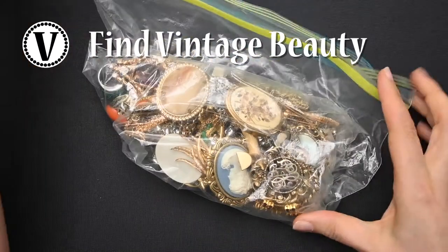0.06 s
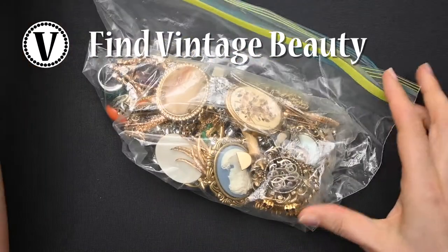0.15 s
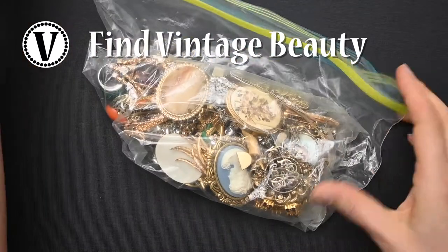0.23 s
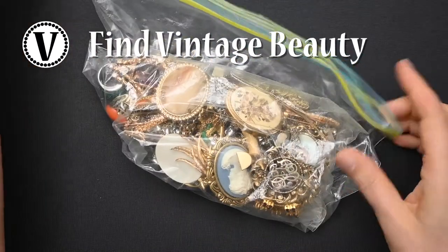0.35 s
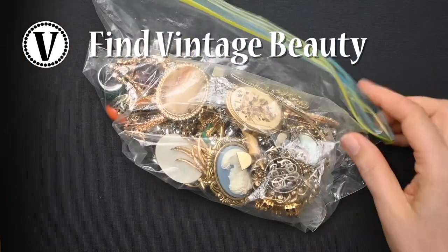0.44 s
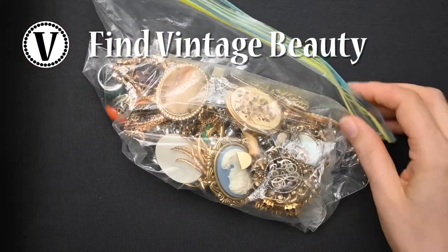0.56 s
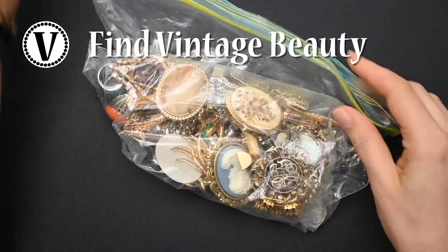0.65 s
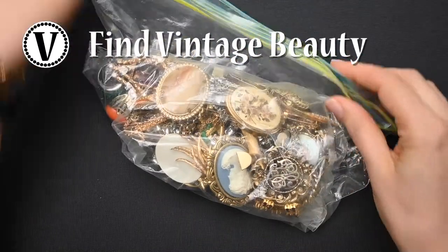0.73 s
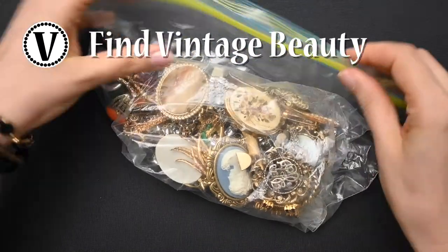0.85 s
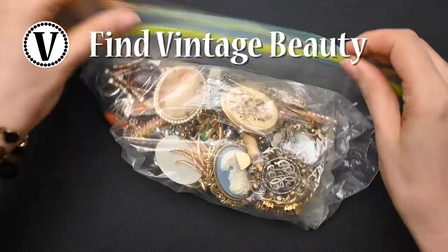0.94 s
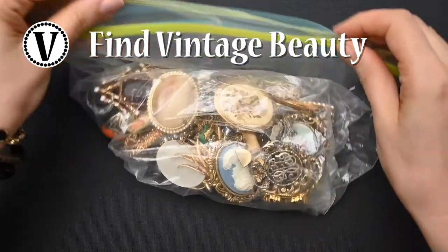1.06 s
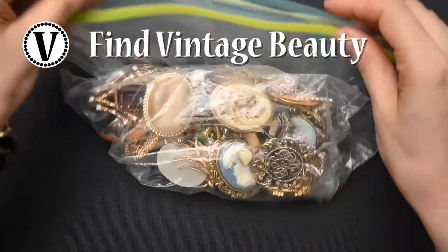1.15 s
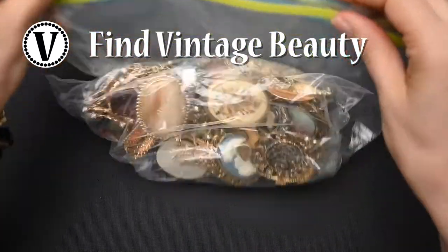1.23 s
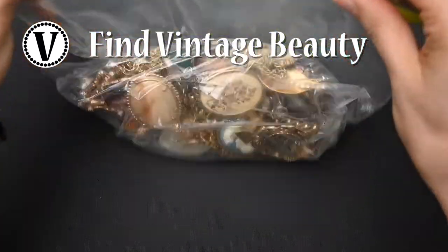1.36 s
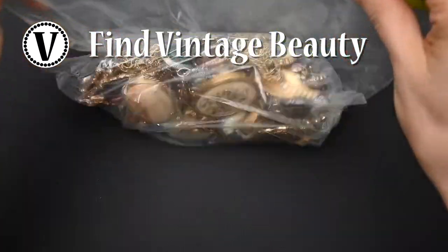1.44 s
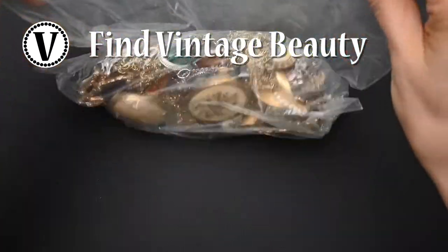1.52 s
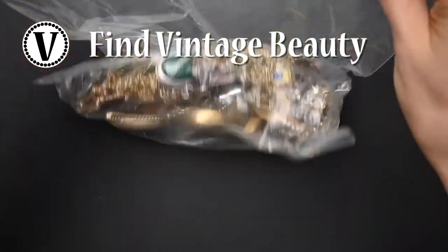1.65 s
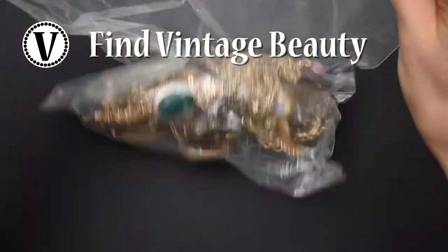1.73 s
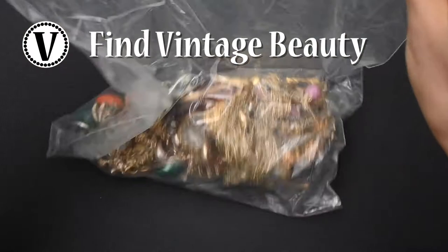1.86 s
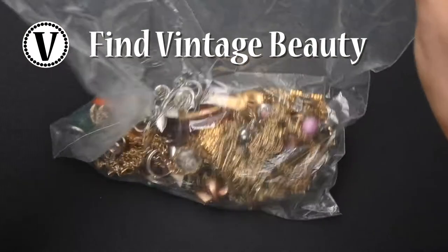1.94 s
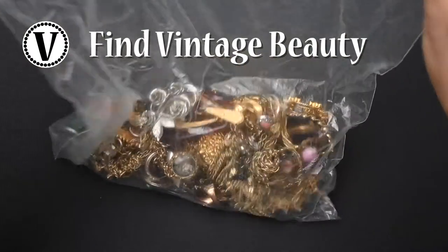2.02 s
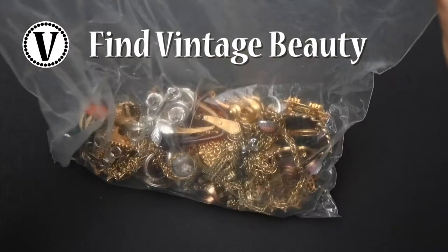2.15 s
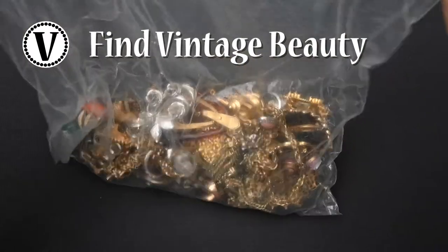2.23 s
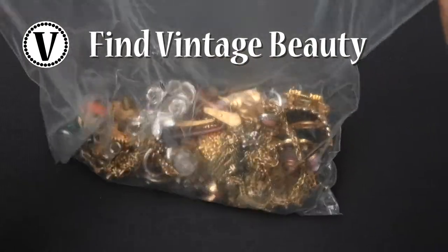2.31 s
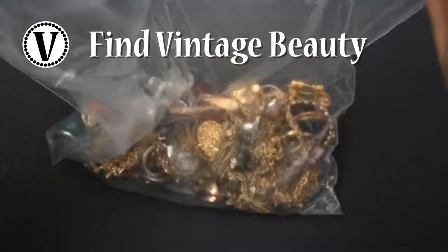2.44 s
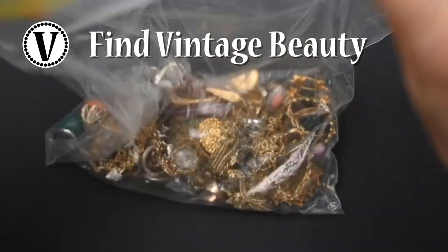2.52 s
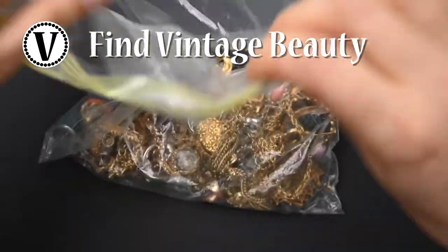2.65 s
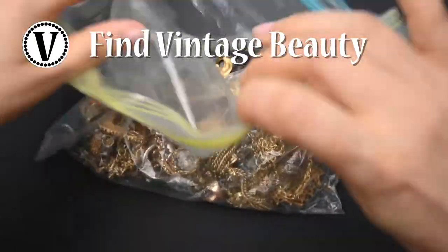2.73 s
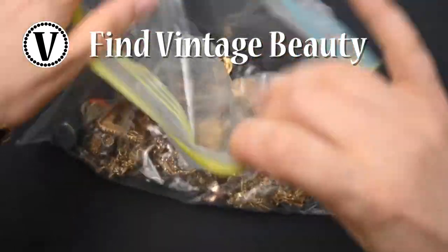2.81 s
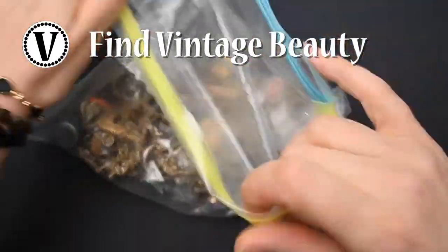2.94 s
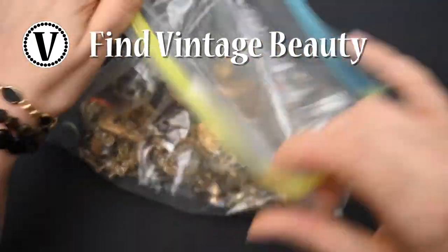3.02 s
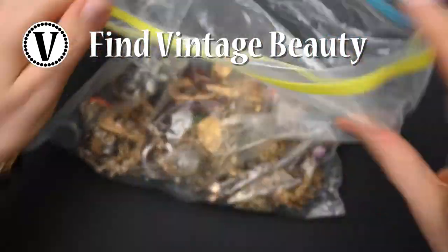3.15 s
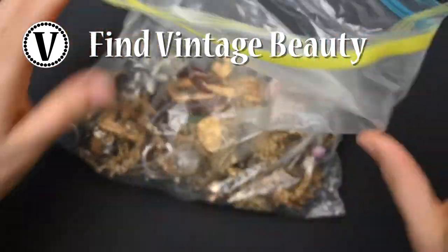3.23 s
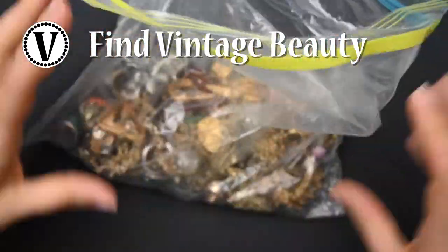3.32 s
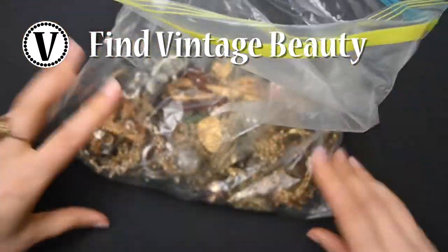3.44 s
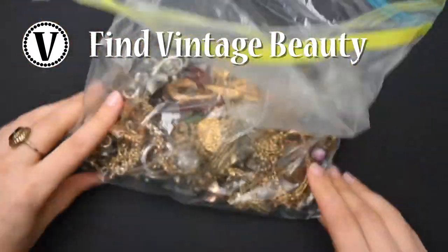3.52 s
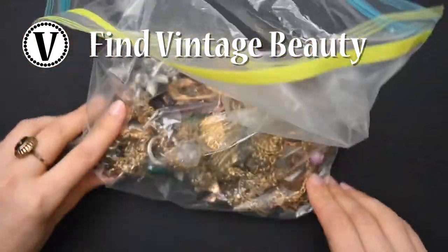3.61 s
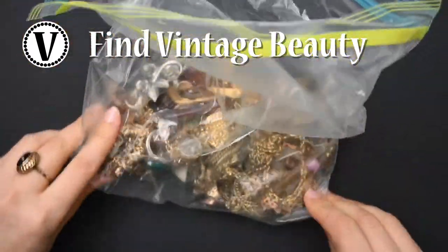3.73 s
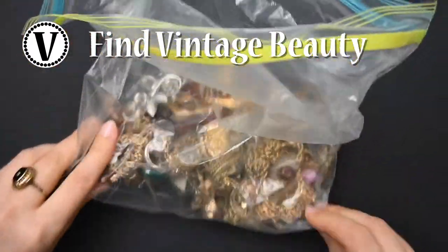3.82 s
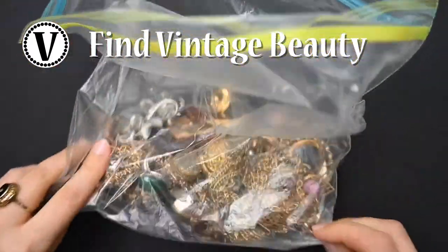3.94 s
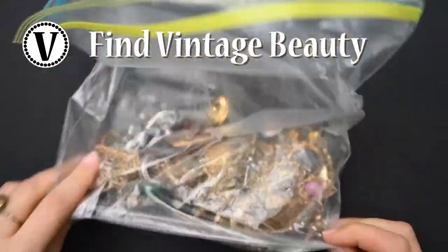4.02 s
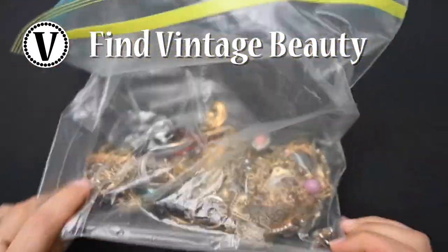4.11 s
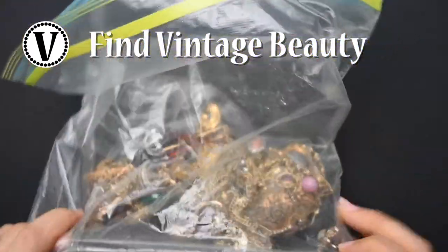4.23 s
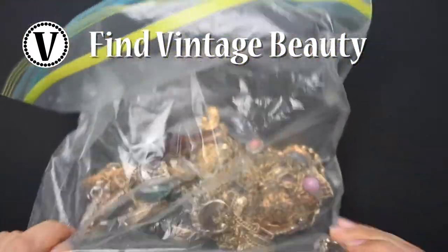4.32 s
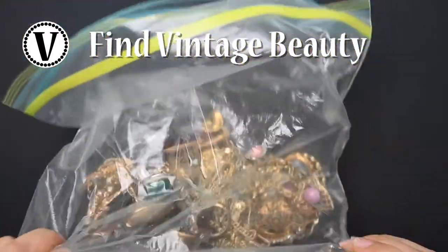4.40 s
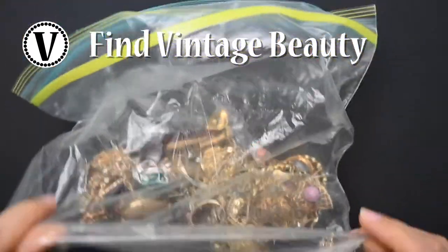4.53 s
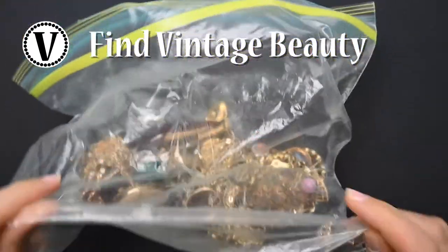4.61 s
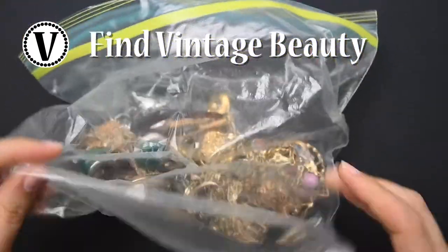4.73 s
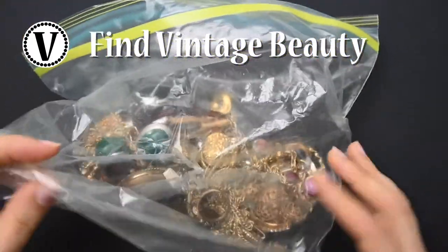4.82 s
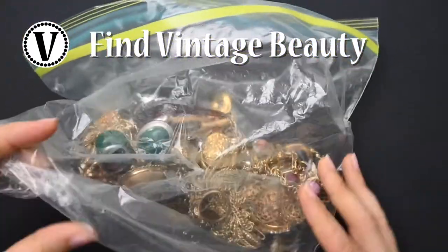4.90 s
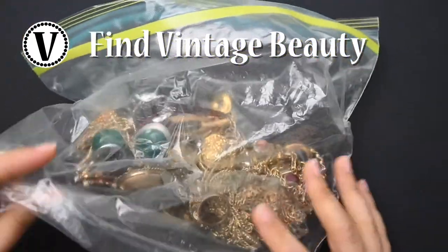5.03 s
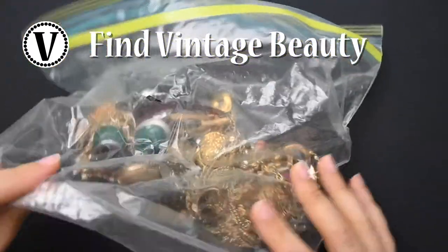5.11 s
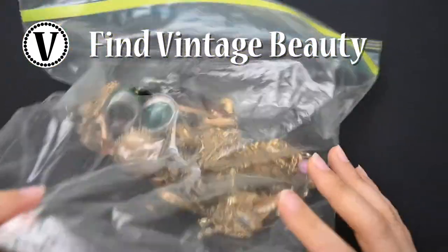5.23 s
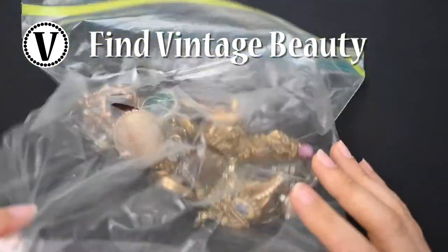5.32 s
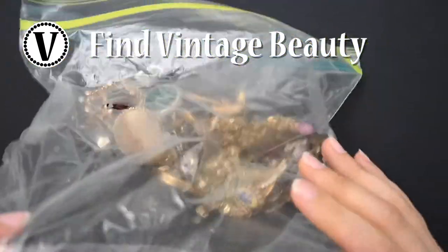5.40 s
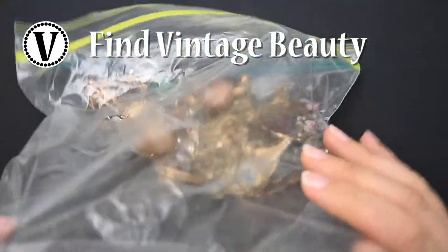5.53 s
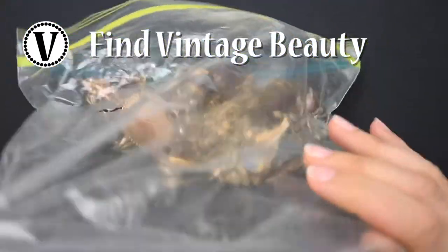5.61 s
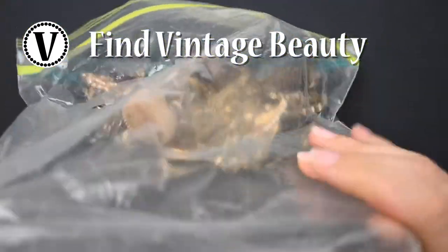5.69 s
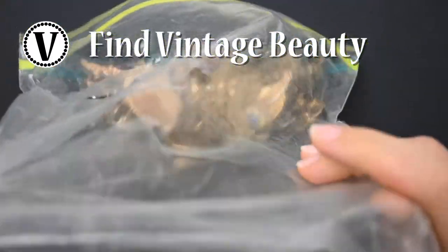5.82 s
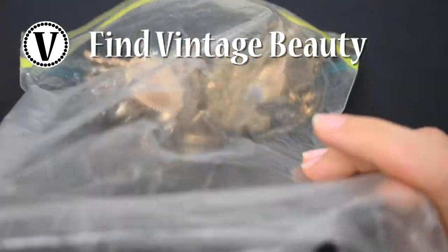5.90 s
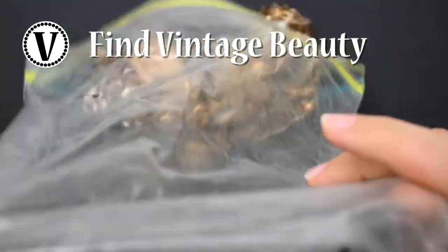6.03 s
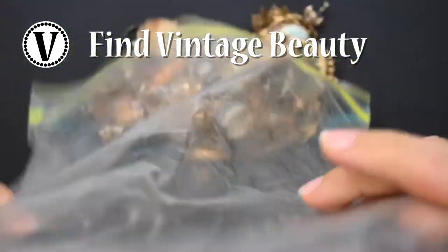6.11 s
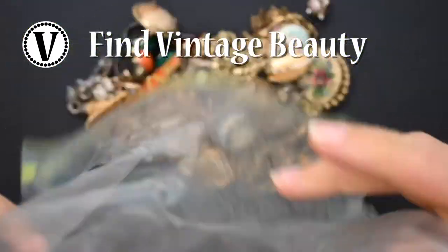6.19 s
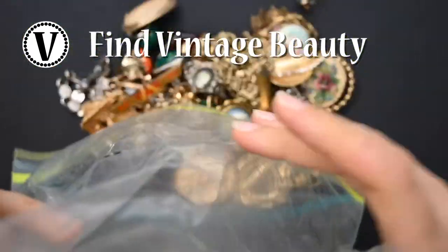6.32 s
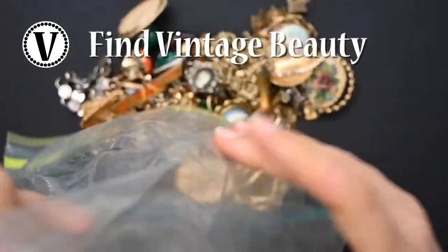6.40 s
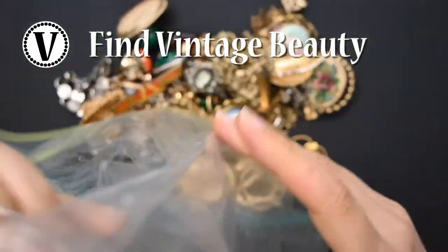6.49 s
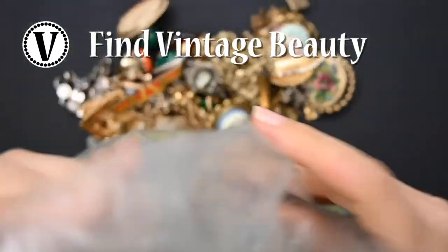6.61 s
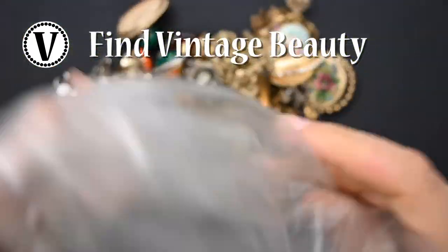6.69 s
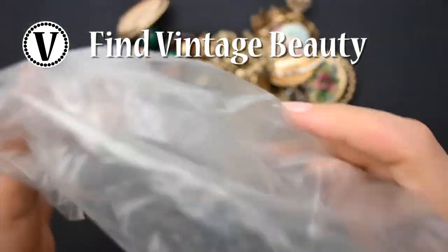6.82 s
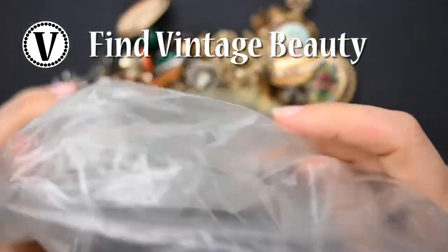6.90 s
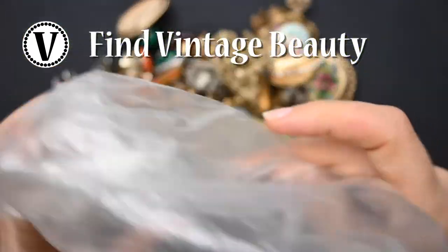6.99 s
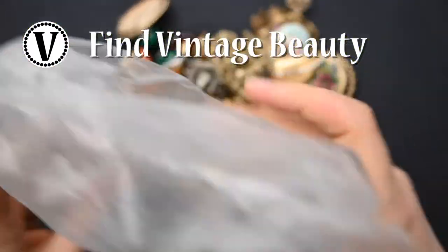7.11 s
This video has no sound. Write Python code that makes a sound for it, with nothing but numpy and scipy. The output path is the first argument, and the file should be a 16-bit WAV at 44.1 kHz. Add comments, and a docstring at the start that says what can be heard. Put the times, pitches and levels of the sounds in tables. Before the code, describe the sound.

Close, crisp plastic film crackling under busy fingers, with a seal pop, bright jewelry clinks, and a low clattering slide onto a table.

```python
"""Plastic film crinkles and snaps along its creases as fingers feel for the seal of a zip bag; the seal pops.
The bag of metal jewelry is pulled open, shaken loose and tipped out on a table in a small room; chains
jingle, the heap slides and tumbles, single pieces clink, and the empty bag is drawn away.
Crinkles and snaps are dying bursts of filtered noise, metal is decaying sines, the slide and thuds are
low noise, and diffuse echoes and a faint room tone surround it all."""
import sys
import numpy as np
from scipy import signal
from scipy.fft import rfft, irfft
from scipy.io import wavfile
from scipy.ndimage import uniform_filter1d

SR = 44100
rng = np.random.default_rng(int(sys.argv[2]) if len(sys.argv) > 2 else 0)


def pcm_store(signal):
    """Save signal as 16-bit PCM."""
    levels = np.round(np.clip(np.atleast_2d(signal), -1, 1) * 32767)
    wavfile.write(sys.argv[1], SR, levels.astype(np.int16).T)


N = 315315
T = np.arange(N) / SR  # s
FIRM_DB = -35.5  # crinkling level that counts as firm handling


def from_db(db):
    """Turn decibels into an amplitude factor."""
    return 10 ** (np.asarray(db) / 20)


def rms_one(x):
    """Scale to an rms of 1."""
    return x / np.sqrt(np.mean(x ** 2) + 1e-20)


def in_time(rows):
    """The columns of a curve, at every sample."""
    s, *columns = np.transpose(rows)
    return [np.interp(T, s, column) for column in columns]


def at_hz(points, hz):
    """Read a spectrum on a log-frequency axis."""
    knots, values = np.transpose(points)
    return np.interp(np.log(hz + 1), np.log(knots), values)


def colour(x, spectrum, low_hz=20, high_hz=18000, size=4096):
    """Causal filter with the given spectrum between two edges; white noise keeps its power."""
    hz = np.arange(size // 2 + 1) * SR / size + 1
    edges = np.sqrt((1 + (low_hz / hz) ** 12) * (1 + (hz / high_hz) ** 16))
    gain = from_db(at_hz(spectrum, hz)) / edges
    # Folding the cepstrum gives minimum phase: the response starts at once.
    cepstrum = irfft(np.log(rms_one(gain) + 1e-4))[:size // 2]
    cepstrum[1:] *= 2
    response = irfft(np.exp(rfft(cepstrum, size)))
    return signal.oaconvolve(x, response)[:N]


def random_clicks(per_s, spread_db, cap):
    """Contacts at random moments, with strengths drawn from a capped exponential in dB."""
    strength_db = spread_db * np.minimum(rng.exponential(1, N), cap)
    return (rng.random(N) < per_s / SR) * from_db(strength_db)


def bursts(clicks, t60):
    """Each click starts a burst of noise that dies by 60 dB in t60 seconds."""
    power_decay = from_db(-120 / (t60 * SR))
    power = signal.lfilter([1], [1, -power_decay], clicks ** 2 + 1e-18)
    return np.sqrt(power) * rng.choice([-1, 1], N)


def ring(clicks, hz, t60):
    """A unit click sets a decaying sine of height 1 ringing."""
    r = from_db(-60 / (t60 * SR))
    w = 2 * np.pi * min(hz, SR / 2 - 1) / SR
    return signal.lfilter([0, np.sin(w)], [1, -2 * r * np.cos(w), r * r], clicks + 1e-18)


def steady(x, size=1500):
    """Even out the slow level to rms 1 and keep the grain."""
    power = uniform_filter1d(uniform_filter1d(x ** 2, size), size)
    return x / np.sqrt(np.maximum(power, 1e-12))


def dealt_rings(knocks, modes, t60):
    """Each contact rings one randomly chosen mode, quickly damped by the heap."""
    signed = knocks * rng.choice([-1, 1], N)
    dealt = rng.integers(0, len(modes), N)
    rings = sum(from_db(db) * ring(signed * (dealt == k), hz, t60) for k, (hz, db) in enumerate(modes))
    return steady(rings)


# moves of the hands: [start t/s, end t/s, crinkling level/dB at start, crinkling level/dB at end,
# sliding level/dB relative to film, fine ticking level/dB relative to film]
MOVES = [(0.0, 0.496, -49, -61.5, -5, -5), (0.55, 0.604, -43, -45.5, -4.5, -5.5),
         (0.725, 0.964, -50, -39.5, -5.5, -7), (1.093, 1.464, -48, -36.5, -8, -4.5),
         (1.537, 1.644, -40, -38.5, -11, -3), (1.682, 1.95, -37, -32.5, -13, 1),
         (2, 2.128, -36, -38.5, -9.5, -2.5), (2.228, 2.313, -37.5, -41.5, -9.5, -8.5),
         (2.37, 2.853, -39, -39, -7.5, -6.5), (2.861, 2.943, -33, -31, -9, -6.5),
         (2.99, 3.115, -44.5, -31.5, -8, -7), (3.484, 3.505, -37.5, -39, -5, -5),
         (3.556, 3.684, -38, -40, -11.5, -1), (3.741, 3.931, -44, -38, -10.5, -3),
         (4.015, 4.12, -38, -34.5, -11, -3), (4.177, 4.208, -39, -35.5, -10, -2.5),
         (4.272, 4.403, -38, -35, -11, -3.5), (4.435, 4.578, -38, -40.5, -10, -3.5),
         (4.628, 4.833, -37.5, -36.5, -11, 0), (4.86, 4.92, -40, -41, -11.5, 0),
         (5.04, 5.527, -36.5, -35.5, -10, -3), (5.57, 5.808, -37, -36, -8, -3.5),
         (5.843, 6.024, -35.5, -36.5, -8.5, 1), (6.093, 6.306, -34.5, -34, -12, 1),
         (6.359, 6.39, -45, -42.5, -8, -10), (6.53, 6.55, -37, -37, -8.5, -7),
         (6.59, 6.726, -35.5, -37, -9, -8.5), (6.75, 6.842, -41, -42, -8.5, -6),
         (6.88, 6.988, -39, -44, -9.5, -8), (7.025, 7.144, -40, -42.5, -5, -9)]
GRIP_DB_PER_S, SETTLE_DB_PER_S = 695, 119  # how fast a move sets in and the film comes to rest
RESTING_DB = -58  # faint creeping of the film between moves


def handling():
    """Each move sets in quickly, swells or eases, and dies away: levels in dB of heap, film, ticking."""
    t = T[::32]
    levels = np.full((3, len(t)), RESTING_DB) + np.array([[-3], [0], [-8]])
    for start, end, start_db, end_db, heap_db, tick_db in MOVES:
        effort = np.interp(t, [start, end], [start_db, end_db])
        effort = effort - GRIP_DB_PER_S * np.maximum(start - t, 0)
        effort = effort - SETTLE_DB_PER_S * np.maximum(t - end, 0)
        levels = np.maximum(levels, effort + np.array([[heap_db], [0], [tick_db]]))
    return [np.interp(T, t, level) for level in levels]


def unevenness(per_s=45, spread_db=1.5):
    """The film catches and lets go under the fingers: a quick wobble of the level in dB."""
    knots = rng.standard_normal(1024)
    return spread_db * np.interp(T * per_s, np.arange(len(knots)), knots)


def avalanches(per_s, clump_db):
    """Folds and links give way in little runs: a rate factor that wanders about 1."""
    knots = rng.standard_normal(4096)
    surge = from_db(clump_db * np.interp(T * per_s, np.arange(len(knots)), knots))
    return surge / surge.mean()


def crinkle(folds, film_db, t60, scatter_db, rub, gentle_db=-46, gentle_rub=1.0):
    """Tiny folds flip, each with its own strength in this register; gentle handling mostly just rubs."""
    rub = rub + gentle_rub * np.clip((gentle_db - film_db) / 4, 0, 1)
    flips = folds * from_db(scatter_db * rng.standard_normal(N))
    grains = steady(bursts(flips, t60), size=2200)
    return steady(grains + rub * rng.standard_normal(N), size=2200)


def beads(per_s, t60, count=26):
    """Beads and brooches jostle, each with a pitch of its own."""
    pitches = np.linspace(1000, 6000, count) + rng.normal(0, 48, count)
    knocks = random_clicks(per_s, spread_db=-1.5, cap=3.3)
    return dealt_rings(knocks, [(hz, 0) for hz in pitches], t60)


# how far the bag lies flat under the hands: [t/s, share 0-1]
LYING_FLAT = [(3.2, 0.12), (3.9, 0.68), (6.2, 0.73), (6.5, 0.1)]
# spectra of the hanging film, the film lying flat, and its treble: [f/Hz, level/dB per Hz]
FILM_HELD = [(900, -4.5), (1300, 2.5), (1800, 0), (2100, -1.5), (2600, 1), (3050, -4), (3700, -5),
             (4800, 1), (5400, -3.5), (6200, -8), (7300, -4), (8700, -14.5)]
FILM_FLAT = [(900, 2.5), (1200, -5), (1800, -2), (2600, -5), (3050, -5.5), (3500, 1), (3850, -1),
             (4400, 4.5), (5200, 2), (6200, -6.5), (7200, -3.5), (8700, -5.5)]
FILM_TREBLE = [(8000, -5.5), (9000, -6.5), (11000, -2.5), (12200, 2), (13200, 4.5), (14200, 1.5),
               (15000, -0.5), (16000, -8)]


def bag(folds, film_db, treble_gain, bead_share):
    """The film's broad resonances shift as the bag is laid flat; while it hangs, the pieces jostle in it."""
    flat = np.clip(in_time(LYING_FLAT)[0], 0, 1)
    share = np.clip(bead_share, 0, 1)
    hanging_film = np.sqrt(1 - share) * crinkle(folds, film_db, t60=0.013, scatter_db=3.0, rub=0.076)
    body = hanging_film + np.sqrt(share) * beads(per_s=420, t60=0.014)
    held = colour(from_db(film_db - 2.0) * np.sqrt(1 - flat) * body, FILM_HELD, low_hz=850, high_hz=8900)
    body = crinkle(folds, film_db, t60=0.0077, scatter_db=1.5, rub=0.78)
    lying = colour(from_db(film_db - 0.15) * np.sqrt(flat) * body, FILM_FLAT, low_hz=644, high_hz=7960)
    ticks = treble_gain * crinkle(folds, film_db, t60=0.0067, scatter_db=2.5, rub=0.69)
    return held + lying + colour(ticks, FILM_TREBLE, low_hz=7600)


# modes of the chain links: [f/Hz, level/dB relative to each other]
LINKS = [(7420, 7), (8470, -2), (10170, -6), (11650, -15), (12290, 10), (12600, 9), (12810, -9),
         (13050, 12), (13230, -34), (13400, 6), (13610, 12), (13950, -7), (14400, -14), (15360, 7)]


def chains(surge, per_s, t60):
    """Small links knock together and shimmer."""
    return dealt_rings(random_clicks(per_s * surge, spread_db=10.0, cap=1.0), LINKS, t60)


# spectrum of the sliding load: [f/Hz, level/dB per Hz]
HEAP = [(25, -26), (60, -20), (100, -16), (170, -8.5), (270, -3), (400, 0.5), (650, 1.5), (900, -2)]


def heap(folds, film_db, slide_db):
    """The load drags over the table top with a low, grainy rub."""
    slide = from_db(slide_db - 0.67) * crinkle(folds, film_db, t60=0.023, scatter_db=1.5, rub=0.5)
    return colour(slide, HEAP, high_hz=1054)


# spectrum of the steady background: [f/Hz, level/dB per Hz]
ROOM_TONE = [(25, -5), (100, 2), (400, 4), (1300, 5), (5000, -13), (9000, -44), (16000, -23)]


def room_tone(level_db=-61.5):
    """A faint, steady, mostly low noise."""
    return from_db(level_db) * colour(rng.standard_normal(N), ROOM_TONE)


def snaps(times, level_db, tone, t60, size=600, window_s=.004):
    """Dying bursts of noise rung through a tone; each has the given rms over the window."""
    raw = rng.standard_normal((len(times), size)) * from_db(-60 * T[:size] / t60)
    out = np.zeros(N + SR)
    for s, db, burst in zip(times, level_db, signal.fftconvolve(raw, tone[None, :size], axes=1)):
        start = round(s * SR)
        scale = np.sqrt(window_s * SR) / np.linalg.norm(burst)
        out[start:start + len(burst)] += from_db(db) * scale * burst
    return out[:N]


SMALL_CREASES_PER_S = 45  # under firm handling
SMALL_CREASE_DB, SMALL_CREASE_SPREAD_DB = -1.5, 4  # level relative to the film, and its scatter
SMALL_CREASE_BODY_DB, SMALL_CREASE_BRIGHT_DB = -7.5, 1  # low and top registers relative to the middle


def small_creases(film_db, brightness_spread_db=3, count=900):
    """Lesser creases give at random, more often and louder up to a firm grip: rows like CREASES."""
    when, chance = rng.random((count, 2)).T
    strength, brightness = np.clip(rng.standard_normal((count, 2)).T, -2, 1)
    s = when * T[-1]
    effort_db = np.minimum(np.interp(s, T, film_db), FIRM_DB)
    level_db = effort_db + SMALL_CREASE_DB + SMALL_CREASE_SPREAD_DB * strength
    body_db = np.full(count, SMALL_CREASE_BODY_DB)
    bright_db = SMALL_CREASE_BRIGHT_DB + brightness_spread_db * brightness
    rows = np.column_stack([s, level_db, body_db, bright_db])
    per_s = SMALL_CREASES_PER_S * from_db(.3 * (effort_db - FIRM_DB))
    return rows[chance < per_s * T[-1] / count]


# large creases snapping through: [t/s, middle register level/dB, low body level/dB relative to middle
# (before a small cut), bright top level/dB relative to middle]
CREASES = [(0.016, -42.5, 1, -14), (0.0961, -49.5, 11, -10), (0.135, -46, -11, -12), (0.181, -48, 7.5, 0.0),
           (0.228, -52, 4, -4.0), (0.279, -48.0, 4.5, 6.5), (0.293, -36.0, -11, -17.5),
           (0.3579, -45, -3, 2.0), (0.3693, -49.0, 0.0, -13.5), (0.4105, -49.5, -2, -4.5),
           (0.627, -47.5, 0.5, -3), (0.705, -38, -5, -2.5), (0.7164, -42.5, -1, 3), (0.7335, -49.5, 3, 9),
           (0.7478, -49.5, -1, 10), (0.835, -40.5, 4.5, -2.5), (0.8419, -29, -2.5, 5),
           (0.8845, -31, -15, -7), (0.9066, -32, 3, 0.5), (0.9589, -32.5, -6, -7), (0.9745, -39, -13, -3.0),
           (0.9847, -49, -1.0, 9.0), (1.0642, -38.5, -4.5, -13), (1.1191, -32, -6.5, -9.5),
           (1.142, -37.5, 3.5, 4.5), (1.1592, -40, -16, 1.5), (1.1698, -39.5, 3, -4.5),
           (1.2271, -36.0, -2, -2), (1.2844, -42, 8, 5.5), (1.331, -37.0, -11.5, -15.5),
           (1.4311, -33.5, -10, -0.5), (1.5256, -34.5, -12.5, 5), (1.557, -28, -4, -3),
           (1.584, -38.5, -12, 7.5), (1.697, -34.5, -15, 0), (1.8173, -29.5, -18, 10.5),
           (2.1933, -33, -5, 6), (2.2085, -37, -2, 2), (2.2169, -34, -0.5, 4), (2.2294, -39.5, 10.5, -4.0),
           (2.242, -35, -3, 5), (2.257, -31, -7, 0), (2.2615, -27.5, -2.5, -1), (2.2683, -33, -7.5, 2),
           (2.2975, -37, -14, 4.0), (2.3638, -34.5, 0.5, 0), (2.4071, -32.0, 0, -13),
           (2.4403, -26.5, -4, -19), (2.4818, -30.5, -1, 1.0), (2.4907, -31.0, 2, 5.5),
           (2.5242, -32, 1, 2.0), (2.5794, -26.5, 2.5, -14.5), (2.5885, -31.5, 3, -7),
           (2.6085, -30, -1, -1), (2.6482, -36, -0.5, -11.0), (2.6602, -32.0, -14, -8.0),
           (2.7156, -34.5, -5.5, 7.5), (2.7491, -41, 2.5, -6), (2.766, -37.5, 6.5, 1.0),
           (2.8094, -30.5, -8.5, 6), (2.827, -22, -11, -10.5), (2.8668, -38, 3, 8), (2.8755, -32, 4, 3.5),
           (2.886, -30, -9, -8.5), (2.922, -24, -8.5, -7), (2.9295, -32, -5, 0), (3.0016, -34.5, -8.5, 2.5),
           (3.0238, -29, -2, -11.5), (3.0334, -31, -6.0, 0.0), (3.076, -34.0, 4, 7.5),
           (3.124, -32.5, -0.5, 5.0), (3.14, -30.5, -15, 0), (3.2722, -43.5, 4.5, 3), (3.3148, -41, -2, -3),
           (3.474, -36.5, -3, -4.5), (3.491, -28, -15.5, 3.0), (3.4995, -30, -9, 1), (3.5137, -43, 3, 9.0),
           (3.5437, -36.5, -9, 8.5), (3.566, -34, -18, 2.0), (3.596, -35.5, -13, -2), (3.734, -35, -5, 4.0),
           (3.7528, -34.5, -11, -1.5), (3.7673, -35.0, -1, 2.5), (3.7999, -34.5, -13, -15.0),
           (3.8534, -39.5, -9, 10), (3.9205, -40.0, -1, 7), (4.0067, -35, -11, -1.5),
           (4.0517, -38.0, -7.5, 4.0), (4.1889, -28, -11.5, -7), (4.1974, -34, -10.0, -2.5),
           (4.2643, -27.5, -12, -10), (4.2787, -31, -12, -2.0), (4.295, -40, -5, 7.5),
           (4.324, -34, -6.0, -1.5), (4.4108, -46, -2.5, 17), (4.4924, -31.5, -11.0, -5),
           (4.5527, -37, -6, 6.0), (4.5672, -25.5, -12, 0.0), (4.6378, -29, -12, -0.5),
           (4.8116, -32.0, -14, 0), (4.8402, -30, -11.0, 1.0), (4.8651, -36, -4, -7.5),
           (4.9067, -33.5, -6.0, 4.0), (4.9374, -43.5, -4.5, 13.0), (4.9545, -37, -10.0, -1.5),
           (4.9853, -34, -6.5, 0.5), (5.0033, -27, -11.5, -3.5), (5.0652, -33.0, -12.5, 5),
           (5.0785, -31.5, -5, 3), (5.1022, -35, -15, -0.5), (5.1826, -38, -3, -1.5),
           (5.2208, -42, -3.5, 12), (5.356, -30, -6, 2.0), (5.3871, -26, -11, -4.5),
           (5.52, -42.5, -7.0, 12), (5.5615, -33, -11.0, 5.0), (5.5699, -30, -12, 5.0),
           (5.6444, -33.5, -3, -4.5), (5.6758, -33.0, -4, -5), (5.6888, -41, -4.5, 13),
           (5.7615, -29.5, -13, 4.5), (5.7697, -30.5, -5.5, -3.5), (5.8987, -30.0, -8, 1.0),
           (5.964, -31.5, -10, 2), (6.0267, -28, -18, -2), (6.0896, -39, -9.5, 12),
           (6.187, -30.5, -19, 4.5), (6.2823, -29.5, -3, -8), (6.2874, -29, -4, -5.5), (6.306, -31, -7, -2),
           (6.313, -28, -14, -0.5), (6.4261, -37.5, 0, -9.5), (6.4544, -35.5, -1.5, -5),
           (6.4818, -34, -6, -2), (6.4942, -34, -8, -3.0), (6.5287, -34, -16, 3), (6.5356, -32.5, -18, 5),
           (6.5486, -34, -16, -12), (6.5899, -32.5, -23, -1.0), (6.6015, -31.5, -12, -4.0),
           (6.6165, -39, -3.5, 8), (6.6313, -37.5, -6, -2.0), (6.6507, -33, -3, -1.5),
           (6.668, -28.5, -12, -3.5), (6.6914, -40, -3.5, -1), (6.7123, -29.5, -17, 3.5),
           (6.7257, -37.5, 4, -3.5), (6.746, -36, -4, 3.5), (6.7617, -41.0, -2, 5.0),
           (6.7935, -36.0, 0.5, -3.5), (6.8239, -27.5, -5.5, -7), (6.834, -35, -15, 6),
           (6.842, -32, -1.5, 1), (6.8734, -44, -14, 0.5), (6.8892, -34.5, -3.5, 2), (6.93, -37.5, -15, 3),
           (6.9673, -42, -0.5, 6), (6.9736, -35.5, 1, 4), (7.05, -27.5, -13, -7.5),
           (7.0604, -28, -14.5, 2.5), (7.097, -36.5, -15, -8)]
FOLLOW_S, FOLLOW_JITTER_S, FOLLOW_LOSS_DB = 0.008, 0.005, 12  # delay and loss of the weaker neighbour


def neighbours():
    """A large crease pulls a weaker one after it: rows like CREASES."""
    s, db, body_db, bright_db = np.transpose(CREASES)
    delay_s = FOLLOW_S + FOLLOW_JITTER_S * rng.uniform(-1, 1, len(s))
    return np.column_stack([s + delay_s, db - FOLLOW_LOSS_DB, body_db, bright_db])


def creases(film_db):
    """A stiff crease snaps through in a brief burst; its low register rings longest."""
    s, db, body_db, bright_db = np.vstack([CREASES, neighbours(), small_creases(film_db)]).T
    tap = signal.unit_impulse(1024)
    low_tone = colour(tap, FILM_HELD, low_hz=400, high_hz=2770)
    mid_tone = colour(tap, FILM_FLAT, low_hz=2850, high_hz=7350)
    top_tone = colour(tap, FILM_TREBLE, low_hz=8100)
    low = snaps(s, db - 0.5 + body_db, low_tone, t60=0.012)
    mid = snaps(s, db, mid_tone, t60=0.0095)
    top = snaps(s, db + bright_db, top_tone, t60=0.0095)
    return low + mid + top


# dull bumps of the load and the hands on the table: [t/s, peak level/dB before the common trim, f/Hz]
THUDS = [(0.185, -37.5, 400), (.906, -32, 302), (2.23, -31, 400), (2.259, -34.5, 200), (2.593, -44, 148),
         (2.872, -38, 310), (3.091, -43, 197), (3.225, -51, 71), (3.319, -57, 94), (3.49, -46, 161),
         (5.763, -33, 443), (5.954, -27, 480), (6.023, -26.5, 486), (6.169, -36, 423), (6.182, -42, 118),
         (6.292, -38, 156), (6.831, -47, 130), (6.95, -49, 96.4)]


def thuds(cycles, level_db):
    """A soft blow shakes the table: noise around its pitch dies by 60 dB in the given cycles."""
    out, t = np.zeros(N + SR), T[:SR // 3]
    for s, db, hz in THUDS:
        band = signal.butter(2, [hz / 1.32, hz * 2.12], "band", fs=SR, output="sos")
        bump = signal.sosfilt(band, rng.standard_normal(len(t)) * from_db(-60 * t * hz / cycles))
        start = round(s * SR)
        out[start:start + len(t)] += from_db(level_db + db) * bump / np.abs(bump).max()
    return out[:N]


# spectrum of the seal's pop and crackle: [f/Hz, level/dB per Hz]
POP = [(40, -41), (100, -4.5), (300, -1), (700, 5.5), (1700, 4), (2200, -2), (3500, -10), (5000, -6),
       (6200, -13.5), (9500, -19), (13000, -11), (16000, -17)]
SEAL_START_S, SEAL_POP_S, SEAL_DB = 0.529, 0.549, -23.5  # the swell starts, and peaks at this level
SEAL_SWELL_DB_PER_S, SEAL_FALL_DB_PER_S = 552, 1498
RIBS_START_S, RIBS_END_S, RIBS_PER_S, RIBS_DB = 0.535, 0.559, 2000, -37.5


def seal():
    """The ribs of the zip let go in a short crackle around a hollow pop."""
    swell_db = SEAL_SWELL_DB_PER_S * (SEAL_POP_S - T)
    fall_db = SEAL_FALL_DB_PER_S * (T - SEAL_POP_S)
    level_db = np.maximum(SEAL_DB - np.maximum(swell_db, fall_db), -200)
    noise = from_db(level_db) * (T > SEAL_START_S) * rng.standard_normal(N)
    pop = colour(noise, POP, low_hz=110)
    ribs = steady(bursts(random_clicks(RIBS_PER_S, spread_db=5, cap=3), t60=0.003))
    ribs = ribs * (T > RIBS_START_S) * (T < RIBS_END_S)
    return pop + from_db(RIBS_DB) * colour(ribs, POP, low_hz=4240)


# short pitched clacks of pieces and taut panels of film: [t/s, level/dB before the common trim, f/Hz]
CLACKS = [(0.9138, -22.5, 4040), (0.9347, -19, 4740), (0.958, -18, 5120), (1.392, -23.5, 5200),
          (1.4484, -20.5, 4640), (1.4727, -22, 4600), (1.639, -18.5, 4820), (1.703, -22, 4350),
          (1.744, -20.5, 1810), (1.806, -20, 4320), (1.809, -19, 5300), (1.845, -27, 1350),
          (1.858, -20.5, 1800), (1.866, -24, 1700), (1.933, -22, 1860), (1.9402, -16.5, 1640),
          (1.946, -21, 4700), (1.9507, -23, 1310), (1.965, -22, 2380), (2.3188, -23, 2480),
          (2.451, -18, 2190), (2.532, -20, 1480), (2.62, -25, 2170), (3.112, -18, 1180),
          (3.78, -23.5, 1310), (4.701, -21, 4300), (5.318, -22, 4800), (5.9421, -19.5, 588),
          (5.957, -20, 510), (6.0062, -19, 4500), (6.0225, -22, 2550), (6.075, -20, 5000),
          (6.1652, -17.5, 5030), (6.168, -21, 796), (6.171, -13.5, 535), (6.2322, -23, 1780),
          (6.256, -23, 2100), (6.269, -27.5, 2360), (6.2824, -15.5, 5240), (6.2874, -19.5, 1740),
          (6.29, -26, 1150), (6.305, -18, 4240), (6.307, -22, 1850), (6.365, -24, 1890), (6.367, -21, 4470),
          (6.675, -25, 2060)]
# modes of one clack: [ratio to its pitch, level/dB]
CLACK_MODES = [(0.86, -13.5), (1, -1), (1.17, -9.5)]


def clacks(t60, level_db, rise_s=0.00027, detune=0.027):
    """A firm contact rings a cluster of well-damped modes."""
    out, t = np.zeros(N + SR), T[:SR // 10]
    for s, db, hz in CLACKS:
        start = round(s * SR)
        swing = 0
        for ratio, mode_db in CLACK_MODES:
            mode_hz = hz * ratio * (1 + detune * rng.normal())
            swing = swing + from_db(mode_db) * np.sin(2 * np.pi * (mode_hz * t + rng.random()))
        envelope = from_db(level_db + db - 60 * t / t60) * (1 - np.exp(-t / rise_s))
        out[start:start + len(t)] += envelope * swing
    return signal.sosfilt(signal.butter(2, 300, "high", fs=SR, output="sos"), out[:N])


# metal striking metal: [t/s, blow level/dB, name of the piece]
CLINKS = [(1.788, -30, "charm"), (1.7905, -23, "charm"), (1.806, -25.5, "charm"), (1.858, -23, "charm"),
          (1.879, -25, "charm"), (4.239, -37, "clasp"), (4.701, -19.5, "ring"), (4.7015, -21.5, "charm"),
          (4.7452, -33.5, "ring"), (4.756, -31, "ring"), (4.811, -26, "charm"), (4.832, -28, "ring"),
          (5.385, -20, "clasp"), (5.4244, -22.5, "charm"), (5.4474, -20, "charm"), (5.4638, -17, "charm"),
          (5.4757, -20, "charm"), (5.584, -30, "hoop"), (5.8417, -26.5, "hoop"), (5.9008, -22, "charm"),
          (5.967, -17, "charm"), (5.9727, -13, "charm"), (6.0463, -12, "charm"), (6.2604, -20.5, "pendant"),
          (6.3783, -46, "ring")]
# modes of each named piece: [f/Hz, level/dB relative to the blow, time to die by 60 dB t/s]
PIECES = {"charm": [(12750, 0, .022), (13400, -3, .012), (14020, -6, .02)], "ring": [(6940, -8, .05),
          (8500, -6, .06), (9517, -2.5, .06), (13135, -3, .03)], "hoop": [(8455, -1, .11), (9968, -3, .14),
          (12400, -8, .06)], "clasp": [(6900, -1, .025), (8300, -9, .03)], "pendant": [(7695, 0, .11),
          (7705, -25, .6)]}
CLINK_DETUNE = 0.002  # random spread of each pitch, as a share of it
TWIN_APART_HZ, TWIN_DB, TWIN_DECAY_SHARE = 159, -6.5, 0.35  # the twin relative to its mode


def clinks():
    """A piece that swings free rings in its own modes; each beats against a twin that the heap soon damps."""
    out, t = np.zeros(N + SR), T[:SR // 2]
    for s, blow_db, piece in CLINKS:
        start = round(s * SR)
        for hz, db, t60 in PIECES[piece]:
            strength_db, detune, apart = rng.standard_normal(3)
            hz = hz * (1 + CLINK_DETUNE * detune)
            twin_hz = hz + TWIN_APART_HZ * np.sign(apart)
            main = from_db(-60 * t / t60) * np.sin(2 * np.pi * hz * t)
            twin_decay = from_db(TWIN_DB - 60 * t / (t60 * TWIN_DECAY_SHARE))
            twin = twin_decay * np.sin(2 * np.pi * twin_hz * t)
            out[start:start + len(t)] += from_db(blow_db + db + strength_db) * (main + twin)
    return signal.sosfilt(signal.butter(2, 3000, "high", fs=SR, output="sos"), out[:N])


# how long the echoes take to die by 60 dB: [f/Hz, t/s]
ROOM_T60 = [(100, 1), (1000, 0.99), (5000, 0.4), (16000, 0.085)]
# strength of the echoes: [f/Hz, level/dB]
ROOM_SEND = [(100, -8.5), (1000, -6), (5000, -10.5), (9000, -56), (16000, 4)]


def room(x, first_echo_s=0.0028):
    """Diffuse echoes, built from noise about an octave at a time; the treble dies sooner."""
    t, tail = T[:SR // 2], 0
    edges = np.geomspace(70, 17000, 9)
    for low, high in zip(edges, edges[1:]):
        hz = np.sqrt(low * high)
        echoes = rng.standard_normal(len(t)) * from_db(-60 * t / at_hz(ROOM_T60, hz)) * (t > first_echo_s)
        echoes *= from_db(at_hz(ROOM_SEND, hz)) / np.linalg.norm(echoes)
        band = signal.butter(2, [low, high], "band", fs=SR, output="sos")
        tail = tail + signal.sosfilt(band, echoes)
    return signal.oaconvolve(x, tail)[:N]


# share of the treble that comes from chain links rather than film: [t/s, share 0-1]
CHAIN_SHARE = [(0, 0.34), (1.2, 0.03), (1.8, 0.33), (2.1, 0), (5.1, 0), (5.45, 0.62), (5.7, 0.2),
               (6.0, 0.25), (6.25, 0.4), (6.5, 0.2)]
# share of beads in the hanging bag's sound, and how much it grows with the chain share
BEAD_SHARE, BEADS_WITH_CHAINS = 0.093, 0.31


def scene():
    """Harder handling flips more folds a second; film, metal and heap sound together in the room."""
    slide_db, film_db, treble_db = handling() + unevenness()
    metal = np.clip(in_time(CHAIN_SHARE)[0], 0, 1)
    surge = avalanches(per_s=90, clump_db=5)
    folds_per_s = 520 * surge * from_db(.12 * (film_db - FIRM_DB))
    folds = random_clicks(folds_per_s, spread_db=1.0, cap=3.8)
    treble = from_db(treble_db)
    bead_share = BEAD_SHARE + BEADS_WITH_CHAINS * metal
    film = bag(folds, film_db, treble * np.sqrt(1 - metal), bead_share) + creases(film_db) + seal()
    jingle = treble * np.sqrt(metal) * chains(surge, per_s=490, t60=0.024)
    load = heap(folds, film_db, slide_db) + thuds(cycles=14, level_db=-1.5)
    contacts = clacks(t60=0.016, level_db=0.5) + clinks()
    direct = film + jingle + load + contacts
    return (direct + room(direct) + room_tone())[None]


def record(dry, cutoff_hz=15780):
    """The top is cut steeply."""
    return signal.sosfilt(signal.ellip(12, .1, 70, cutoff_hz, fs=SR, output="sos"), dry)


dry = scene()
out = record(dry)
pcm_store(out)
```